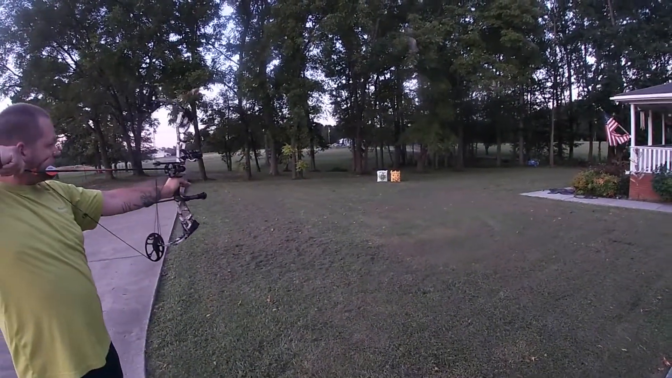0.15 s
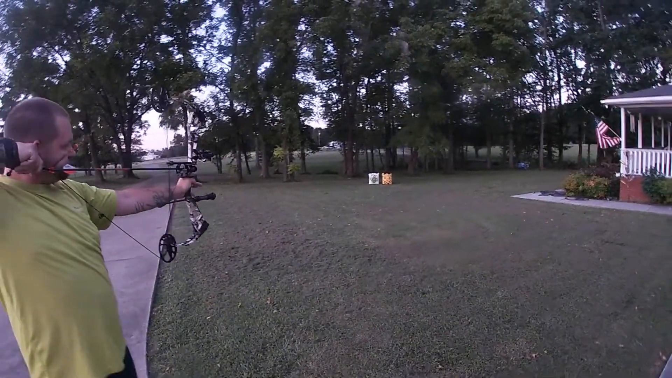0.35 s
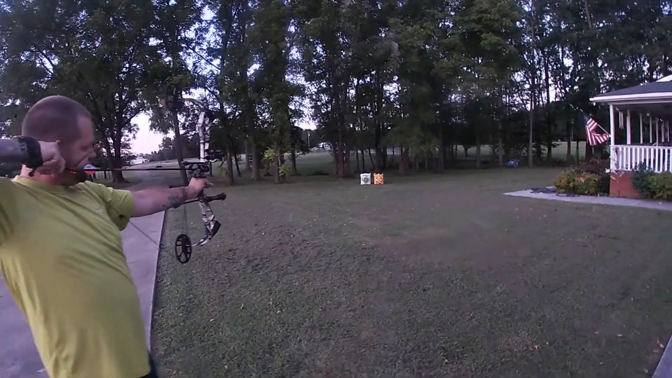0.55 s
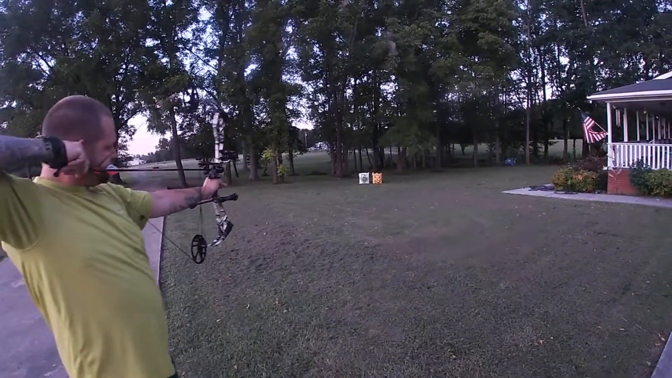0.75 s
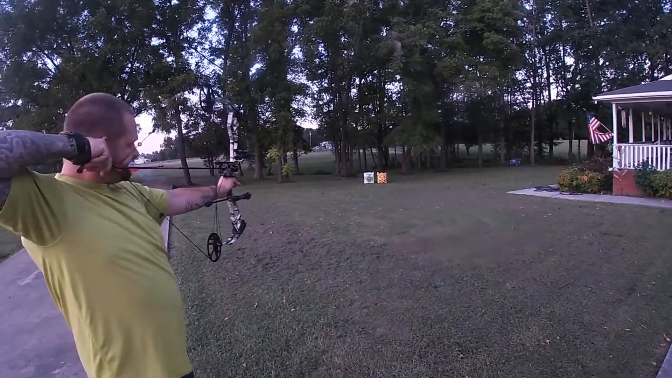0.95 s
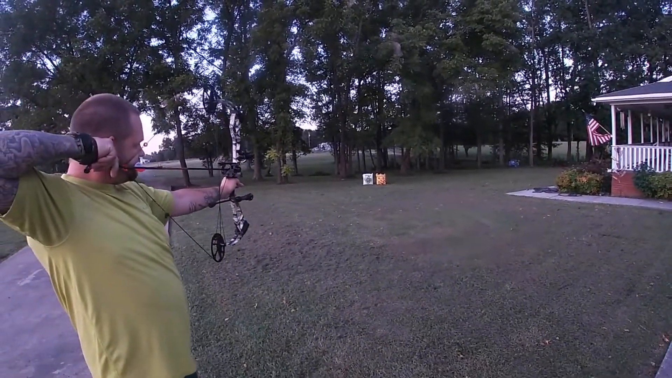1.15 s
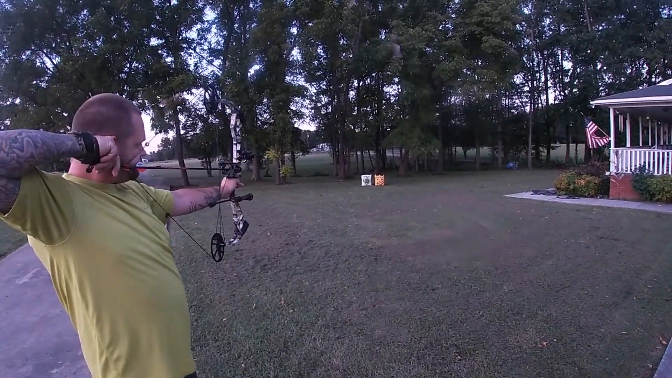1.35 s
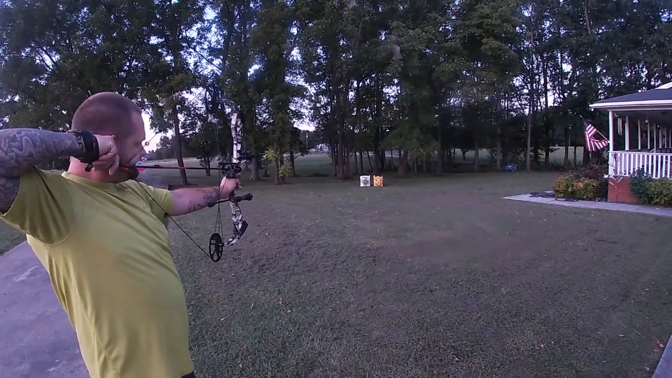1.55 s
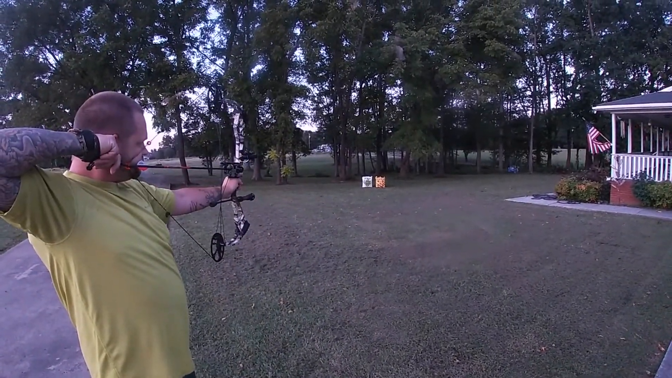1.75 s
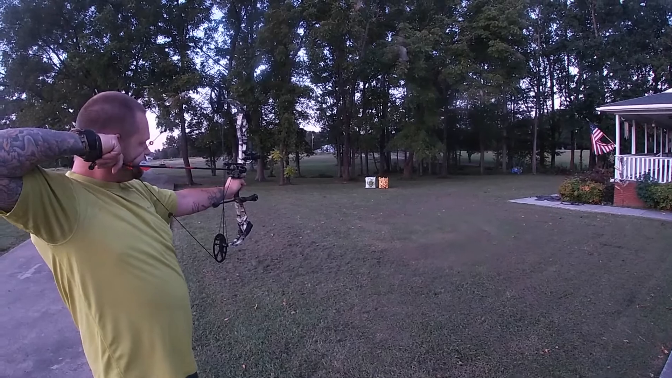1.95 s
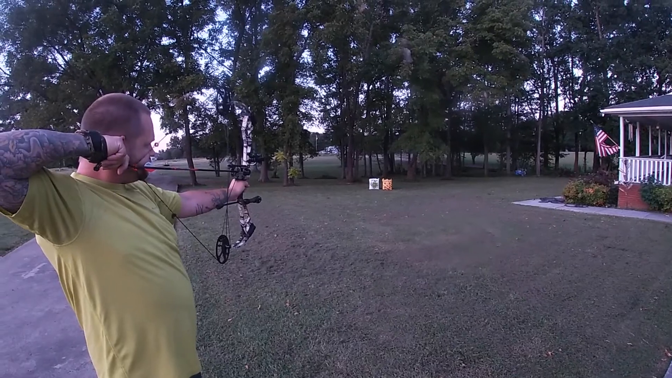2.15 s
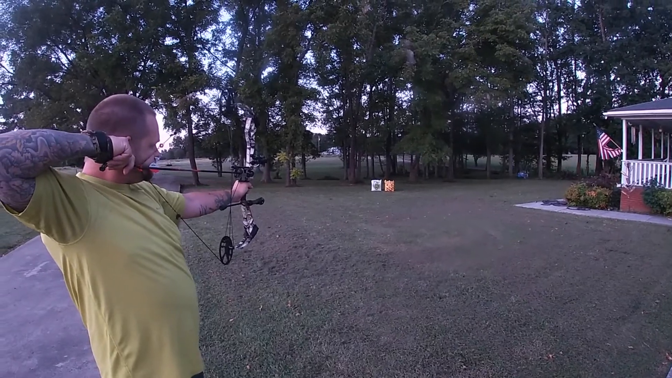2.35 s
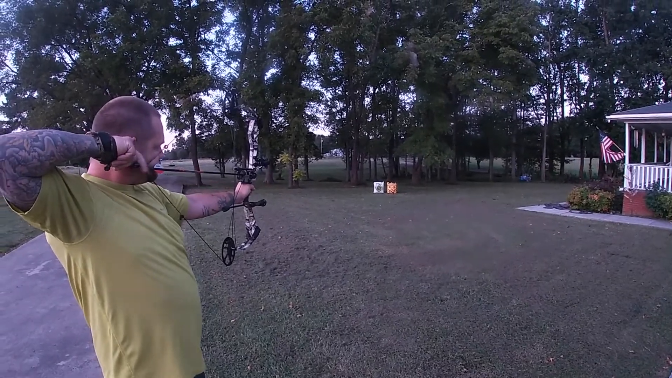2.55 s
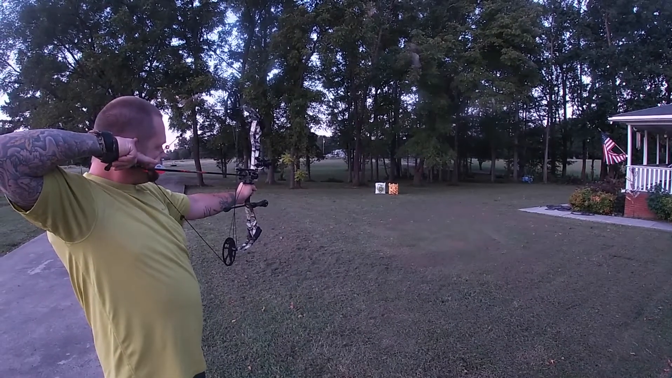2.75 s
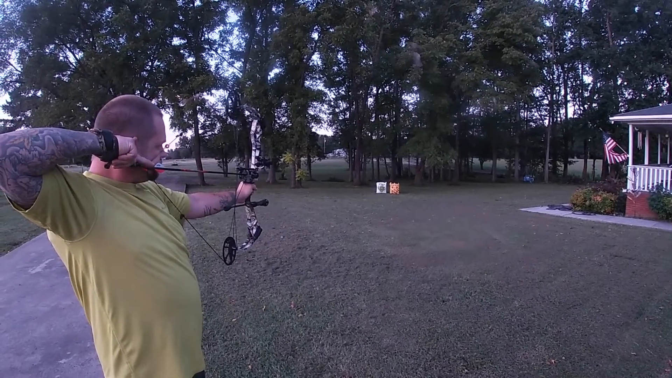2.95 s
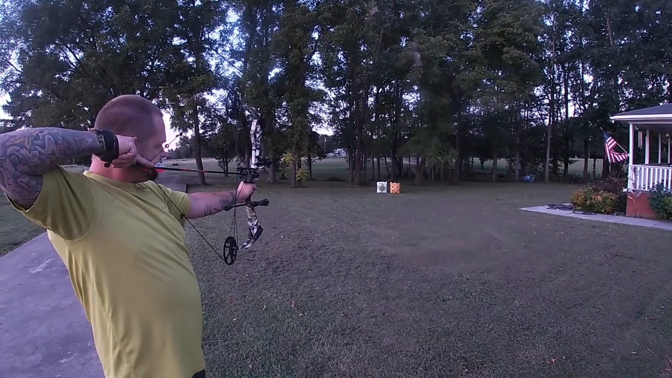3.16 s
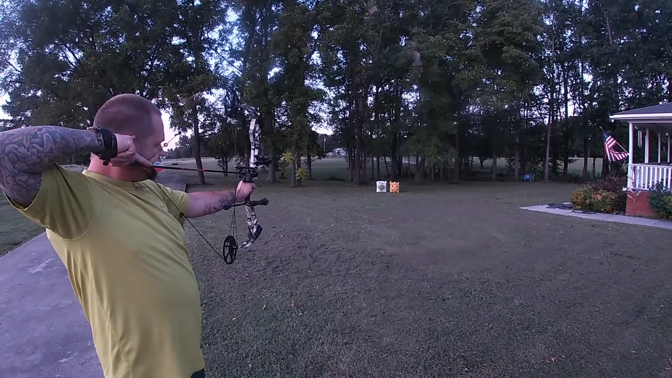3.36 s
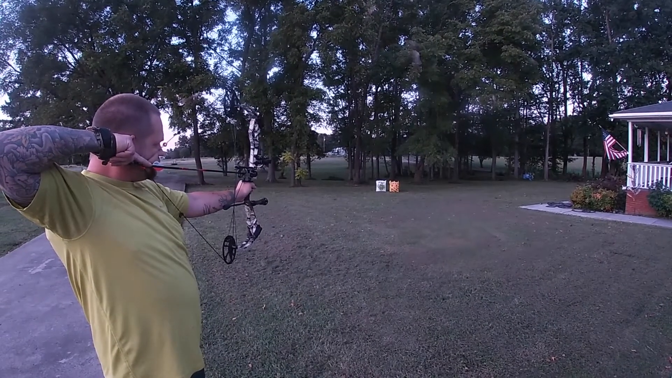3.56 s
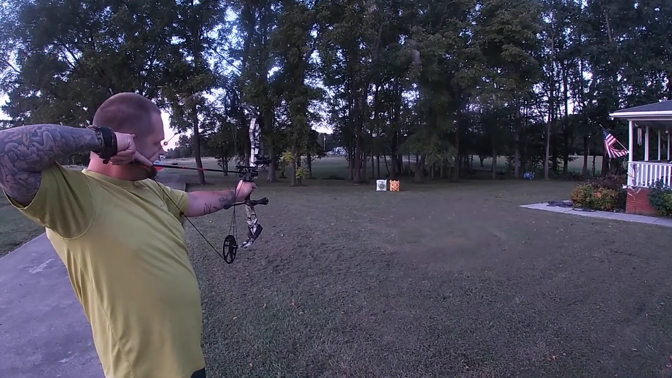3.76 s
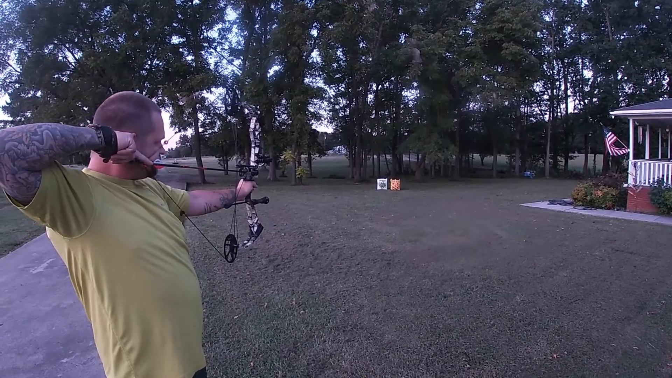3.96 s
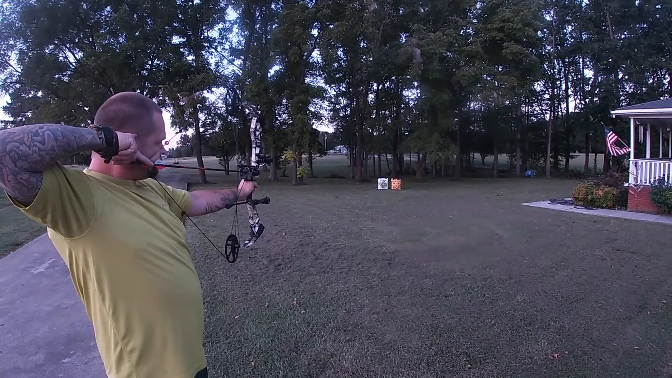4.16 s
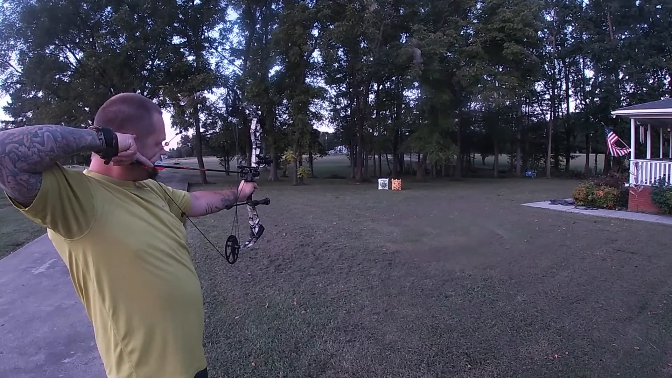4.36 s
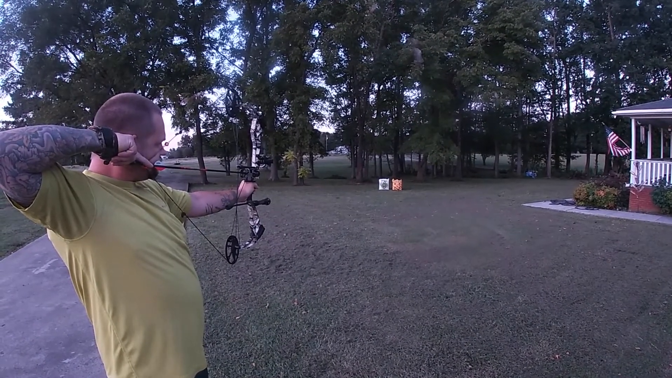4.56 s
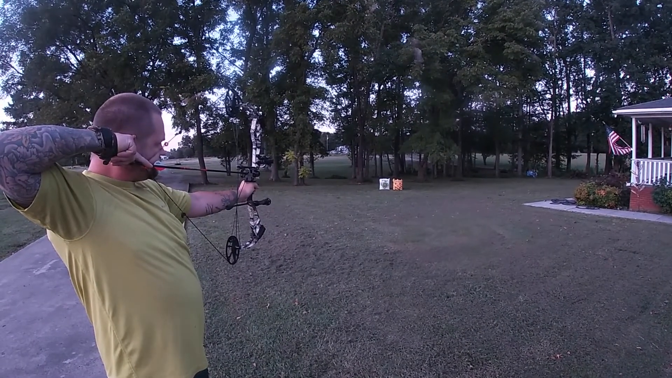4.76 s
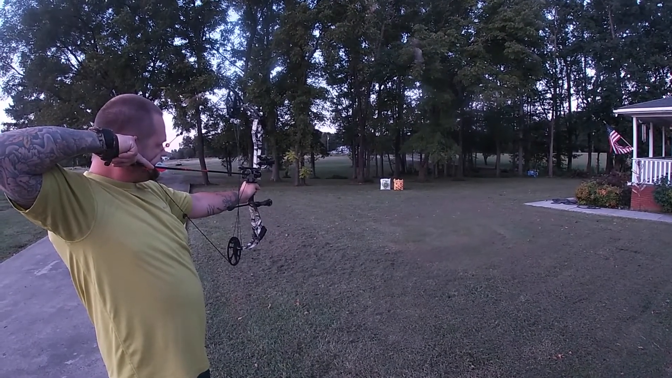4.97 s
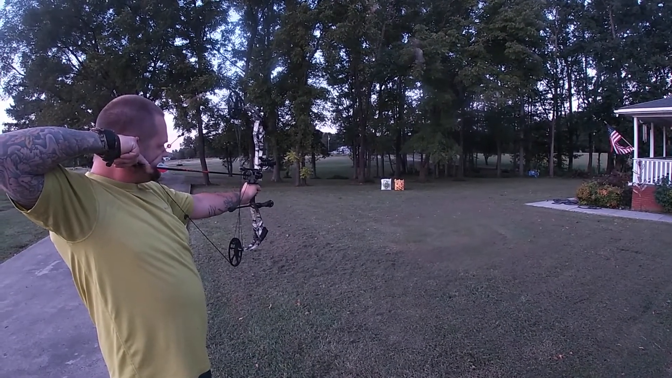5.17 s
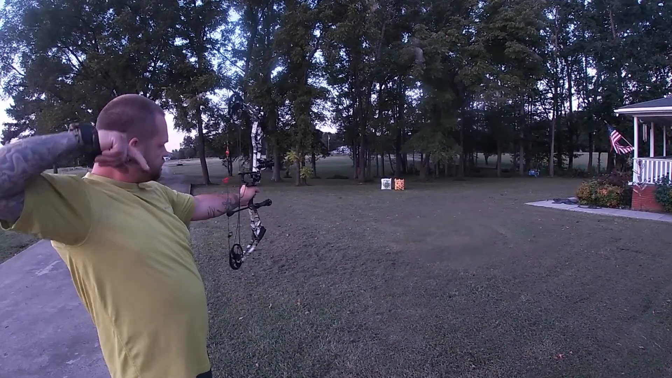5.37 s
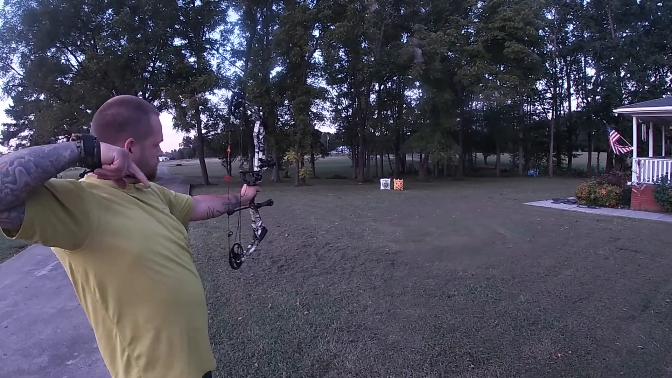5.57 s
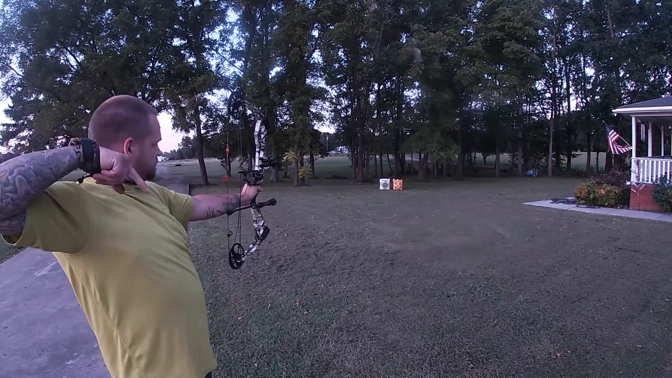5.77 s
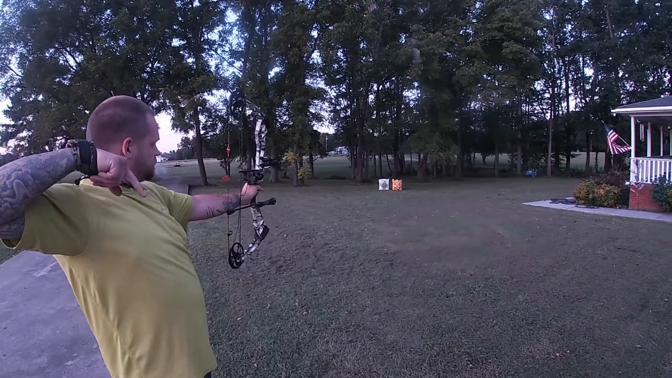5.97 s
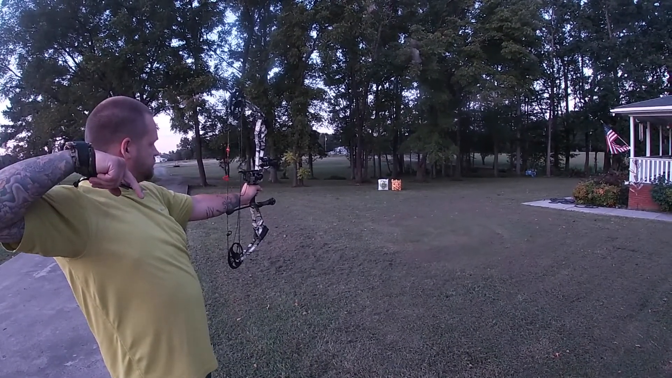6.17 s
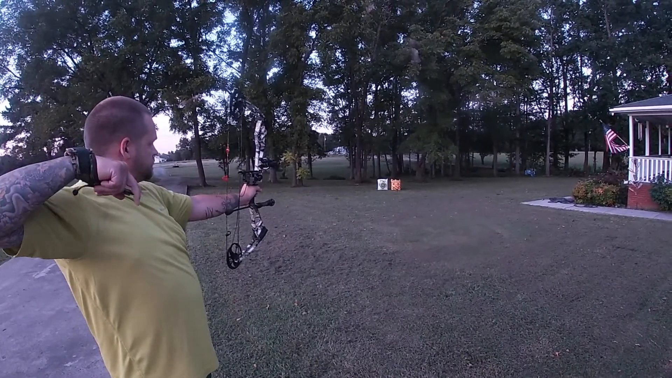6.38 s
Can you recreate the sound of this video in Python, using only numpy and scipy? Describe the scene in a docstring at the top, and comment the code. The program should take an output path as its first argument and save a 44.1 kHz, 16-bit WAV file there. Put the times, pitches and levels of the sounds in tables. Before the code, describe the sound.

A quiet outdoor background runs throughout: faint, high cricket trills and chirps, a distant rush of traffic, a barely audible machine hum and a light wind rumble on the microphone. A few soft gear knocks come in the first second, with one more tick at 4.1 seconds. A bird gives a thin, high note at 2.3 seconds, and a low puff of wind bumps the microphone around 2.5. From 3.5 to 5 seconds a far bird faintly repeats a short song four times. At 5.3 seconds a compound bow fires close by: a loud, sharp snap with a very brief rattle of string, cables and ringing limbs. At about 5.6 seconds the arrow hits a distant target with a sharp crack and a small, low thud. Both echo off a house and trees for about half a second, and the crickets carry on until 6.4 seconds.

```python
"""On a lawn at dusk, an archer close by shoots a compound bow: its parts strike in turn and its limbs
(the bending arms) ring. The arrow cracks into a far target. A house front and a row of trees throw
the sharp sounds back. Crickets rub their wings, birds whistle and gear knocks softly. Far away, traffic
and a machine hum, while a light breeze puffs on the microphone."""
import sys
import numpy as np
from scipy import signal
from scipy.io import wavfile
from scipy.ndimage import uniform_filter1d

SR = 44100
rng = np.random.default_rng(int(sys.argv[2]) if len(sys.argv) > 2 else 0)


def bounce(signal):
    """Save signal as a 16-bit WAV file at the path given by the first command-line argument."""
    frames = np.transpose(np.atleast_2d(signal))
    limited = np.clip(frames, -1, 1)
    pcm = np.round(limited * 32767).astype(np.int16)
    wavfile.write(sys.argv[1], SR, pcm)


N = 283122

# Bow parts strike in turn (release jaw, string on its stop, limbs, cables). A fade is a fall of 60 dB.
# start_s, peak_db, bright_hz, fade_s, limb_db
BOW_BLOWS = [(5.3120, -17, 6200, .007, -19), (5.3140, -1, 5700, .009, -27), (5.319, -21, 5200, .09, -33),
             (5.333, -16, 3300, .04, -20), (5.3372, -5, 4200, .009, -11), (5.3395, -3, 6500, .018, -13),
             (5.349, -4, 5900, .018, -12), (5.371, -6, 3500, .022, -24)]
# The tones a limb rings with: pitch_hz, level_db, fade_s
LIMB_TONES = [(178, -9.5, .045), (225, -13, .03), (345, -12, .05), (450, -5, .03), (610, -4, .022),
              (800, -2.5, .016), (1080, -4.1, .022), (1400, -3.5, .016), (1750, -5, .014), (2240, -4, .03),
              (2900, -8.6, .014)]
# The broad snap in each blow: frequency_hz, level_db
SNAP_SPECTRUM = [(60, -40), (200, -16), (700, -5), (2000, -3), (3500, -2), (6000, -3), (8000, -14),
                 (10500, -28), (14000, -42), (16000, -60)]
# A low push of air as the limbs fly forward: time_s, peak_db, pitch_hz
AIR_PUSH = (5.349, -27.5, 70)
# The arrow's crack: frequency_hz, level_db
CRACK_SPECTRUM = [(120, -42), (200, -12), (480, -6), (900, -11), (1910, -11), (2700, -8), (3690, 0),
                  (4120, 0), (5840, -4), (6280, -7), (7140, -22), (7800, -15), (9930, -20), (13800, -27),
                  (16000, -32)]
# The crack and the low boom after it: start_s, crack_db, boom_db, boom_hz, fullest_after_s, half_length_s
CRACK_AND_BOOM = (5.6406, 1, -21, 182, .011, .010)
# Echoes off the house, for bow and target: delay_s, level_db, smear_s
BOW_ECHOES = [(.004, -19, .01), (.070, -21, .0012), (.080, -20, .0015)]
TARGET_ECHOES = [(.0008, -12, .0015), (.005, -18, .012), (.024, -15, .006), (.030, -14, .01)]
# How long the trees echo: frequency_hz, fade_s
TREE_FADES = [(200, .3), (700, .45), (2000, .7), (4000, .7), (6000, .58), (9000, .38), (14000, .22)]
# The tone of their echo: frequency_hz, level_db
TREE_SPECTRUM = [(200, 8), (1000, 8), (2500, 2), (5000, 0), (8000, 0), (11000, -5), (13000, -14),
                 (15000, -28)]
# Tree cricket trills: start_s, end_s, pitch_hz, level_db
CRICKET_TRILLS = [(0, .18, 4100, -67), (.37, .97, 4000, -57.3), (.58, .92, 3810, -57.5),
                  (.65, 1.06, 4150, -58), (1.17, 1.63, 4170, -61.8), (1.06, 1.55, 3950, -67),
                  (1.63, 2.05, 3820, -61), (1.98, 2.52, 4080, -61.3), (2.5, 2.95, 3990, -56.8),
                  (2.7, 3.0, 3800, -64.8), (2.7, 2.9, 3500, -70), (2.93, 3.25, 4000, -65),
                  (3.12, 3.88, 4080, -61.8), (3.28, 3.75, 3850, -61), (3.85, 4.45, 4090, -59.8),
                  (3.87, 4.3, 3960, -59.8), (4.73, 5.3, 4030, -57.8), (4.78, 5.3, 3860, -63.8),
                  (4.72, 4.95, 3550, -68), (5.48, 5.92, 4460, -56.8), (5.9, 6.12, 4180, -61.8),
                  (6.13, 6.45, 3830, -58.3), (6.2, 6.45, 4100, -64.8)]
# Field cricket chirps: first_stroke_middle_s, stroke_count, level_db
CRICKET_CHIRPS = [(.358, 2, -65.5), (.948, 6, -62.5), (1.598, 6, -64.5), (2.271, 6, -62.5),
                  (3.058, 6, -63.5), (3.729, 6, -64.5), (4.432, 5, -62.5), (5.084, 5, -64.5),
                  (5.923, 2, -63.5)]
# The shape of a near bird's note: after_s, pitch_hz, level_db
NEAR_NOTE = [(0, 9500, -30), (.003, 8200, -14), (.007, 7200, -4), (.016, 6850, 0), (.028, 6900, 2),
             (.038, 7200, -4), (.05, 7800, -16), (.065, 8800, -26)]
# When it calls: start_s, level_db
NEAR_CALLS = [(2.318, -49), (5.285, -58)]
# The notes of a far bird's song: after_s, length_s, from_hz, to_hz, level_db
FAR_NOTES = [(0, .012, 3700, 4900, -54), (.065, .02, 2650, 2750, -66), (.078, .03, 2900, 3050, -62),
             (.12, .02, 3000, 2950, -66), (.17, .03, 3250, 3250, -61), (.195, .035, 3200, 2650, -62),
             (.25, .04, 3150, 3250, -69), (.31, .045, 2120, 2420, -58.5)]
# When it sings: start_s, level_db
FAR_CALLS = [(3.475, -1.5), (3.918, -1.5), (4.367, -3), (4.83, -6)]
# Small knocks on gear and a handheld camera: start_s, level_db, contact_hz, spread_octaves
GEAR_KNOCKS = [(.254, -27, 470, .3), (.468, -32, 2950, .3), (.7378, -24, 800, 2.2), (1.012, -31, 1800, .8),
               (4.1074, -28, 6000, .3)]
# The tones they ring with: pitch_hz, level_db, fade_s
GEAR_TONES = [(185, -3, .06), (470, -6, .035), (1100, -2, .011), (2950, -6, .005), (6000, -12, .004)]
# Wind rumble on the microphone: time_s, level_db, centre_hz
BREEZE_CURVE = [(0, -55, 45), (.3, -53, 60), (.7, -54, 52), (.77, -43, 30), (.96, -49, 36), (1.15, -47, 38),
                (1.6, -53, 52), (1.7, -59, 70), (1.92, -47, 50), (2.03, -56, 48), (2.3, -58, 55),
                (2.42, -46, 46), (2.6, -52, 57), (3.05, -59, 65), (3.25, -53, 42), (3.66, -47, 62),
                (3.74, -57, 48), (3.97, -49, 58), (4.5, -57, 70), (4.85, -50, 55), (5.3, -55, 70),
                (5.7, -54, 70), (5.93, -64, 75), (6.03, -42, 60), (6.17, -47, 84), (6.29, -60, 60),
                (6.42, -51, 75)]
# Single gusts on it: time_s, peak_db, pitch_hz
WIND_PUFFS = [(2.366, -32, 90), (2.4845, -18, 100)]
# Far road noise: frequency_hz, level_db
ROAD_SPECTRUM = [(60, -10), (120, -3), (170, 3), (220, -3), (320, -8.5), (620, -3), (1500, -5),
                 (2200, -15.5), (3000, -22.5), (5000, -23.3), (7000, -27.3), (8500, -38), (11000, -48),
                 (13000, -58), (14500, -82)]
# How it drifts: time_s, level_db, treble_lift_db, low_lift_db
ROAD_DRIFT = [(0, -47, 2, 4), (1.0, -46.5, 1, 2.5), (1.47, -46, -2, -2), (2.23, -49.5, 0, 0),
              (2.75, -50, 1, -1), (3.6, -48.5, 0, 0), (4.35, -48.5, 1, -1), (4.62, -45.5, 0, -2),
              (5.0, -48, 0, 0), (5.6, -48, 0, 0), (6.01, -50.5, 0, 2), (6.42, -49, -1, 0)]


def bow(rise_s=.0004, broad_db=-.4, band_ratio=1.19):
    """Each blow is a dying rattle with a bright centre, and it sets the limbs ringing."""
    blows, kicks, limbs = np.zeros(N), np.zeros(N), np.zeros(SR)
    snap = click(SNAP_SPECTRUM)
    t = np.arange(0, .07, 1 / SR)
    for start_s, peak_db, hz, fade_s, limb_db in BOW_BLOWS + cable_clatter():
        grit = rng.standard_normal(len(t)) * amp(-60 * t / fade_s) * (1 - np.exp(-t / rise_s))
        broad = signal.fftconvolve(grit, snap)[:len(t)]
        bright = bandpass(grit, hz / band_ratio, hz * band_ratio)
        blow = unit(bright) + amp(broad_db) * unit(broad)
        add(blows, start_s, amp(peak_db) * blow / abs(blow).max())
        add(kicks, start_s, amp(limb_db) * grit / np.linalg.norm(grit))
    for hz, db, fade_s in LIMB_TONES:
        add(limbs, 0, amp(db) * ring(hz, fade_s))
    bass_cut = signal.butter(5, 135, "highpass", fs=SR, output="sos")  # slim limbs give no deep bass
    return signal.sosfilt(bass_cut, blows + signal.fftconvolve(kicks, limbs)[:N])


def cable_clatter(count=13, start_s=5.341, gap_s=.0035, fade_s=.032, low_hz=1900, high_hz=5000):
    """Cables and their wheels rattle on after the string lands: extra, fading rows for BOW_BLOWS."""
    jitter, brightness, strength = rng.random((count, 3)).T
    after_s = (np.arange(count) + jitter) * gap_s
    hz = low_hz * (high_hz / low_hz) ** brightness
    peak_db = -10.5 - 5500 * after_s ** 2 + 4 * (strength - .5)
    limb_db = -14 - 500 * after_s
    return list(zip(start_s + after_s, peak_db, hz, np.full(count, fade_s), limb_db))


def crack_and_thud(sag=.1, rustle_db=-34, rustle_fade_s=.15):
    """The arrow cracks into the target. A dull rustle and a short, low boom follow the crack."""
    start_s, crack_db, boom_db, boom_hz, fullest_s, half_s = CRACK_AND_BOOM
    crack, thud = np.zeros((2, N))
    t = np.arange(0, .06, 1 / SR)
    add(crack, start_s, -amp(crack_db) * click(CRACK_SPECTRUM))
    rustle = unit(bandpass(rng.standard_normal(len(t)), 130, 700, order=2))
    add(thud, start_s, amp(rustle_db) * rustle * amp(-60 * t / rustle_fade_s))
    cycles = boom_hz * t * (1 + sag * (1 - t / (2 * fullest_s)))  # the pitch sinks
    boom = np.sin(2 * np.pi * cycles) + .15 * np.sin(2 * np.pi * 2.4 * cycles)
    swell = np.exp(-abs((t - fullest_s) / half_s) ** 3)
    add(thud, start_s, -amp(boom_db) * boom * swell)
    return crack, thud


def house_echo(sound, echoes):
    """Each echo is a short burst of bounces off rails, posts and wall."""
    bounces, t = np.zeros(SR), np.arange(0, .05, 1 / SR)
    for delay_s, db, smear_s in echoes:
        burst = rng.standard_normal(len(t)) * np.exp(-t / smear_s)
        add(bounces, delay_s, amp(db) * burst / np.linalg.norm(burst))
    return signal.fftconvolve(sound, bandpass(bounces, 1200, 8500))[:N]


def tree_echo(sound, stretch, rise_s=.012):
    """Trunks and leaves return a wash of echoes, each band dying at its own speed."""
    hz, t, bands = signal.stft(rng.standard_normal(SR), SR, nperseg=256)
    fade_s = stretch * look_up(TREE_FADES, hz)[:, None]
    bands = bands * amp(look_up(TREE_SPECTRUM, hz)[:, None] - 60 * t / fade_s)
    tail = signal.istft(bands, SR, nperseg=256)[1]
    tail *= 1 - np.exp(-(np.arange(len(tail)) / SR / rise_s) ** 2)
    return signal.fftconvolve(sound, tail / np.linalg.norm(tail))[:N]


def tree_crickets(strokes_per_s=37.5, sounding_share=.66, sag=.045, rough=.55, wander=.004, uneven=.04):
    """Fast wing strokes make a swelling trill; each is a rough tone that sinks in pitch."""
    out = np.zeros(N)
    for start_s, end_s, hz, db in CRICKET_TRILLS:
        t = np.arange(0, end_s - start_s, 1 / SR)
        haste, wobble_speed, offset = rng.random(3)
        flutter, drift, pace = (smooth_noise(SR, width)[:len(t)] for width in (90, 2500, 2500))
        rate = strokes_per_s * (.98 + .04 * haste + uneven * pace)
        stroke = np.minimum(np.cumsum(rate) / SR % 1 / sounding_share, 1)  # runs 0 to 1, then rests
        wobble = 1 + .3 * np.sin(2 * np.pi * ((5 + 9 * wobble_speed) * t + offset)) + rough * flutter
        swell = np.minimum(1, .7 + t / .6) * np.minimum(1, (t[-1] - t) / .03)
        tone = note(hz * (1 + sag * (.5 - stroke) + wander * drift))
        add(out, start_s, amp(db) * swell * wobble * np.sin(np.pi * stroke) * tone)
    return out


def field_cricket(pitch_hz=5380, gap_s=.0476, stroke_s=.021):
    """A few clean wing strokes in a row make each chirp."""
    out = np.zeros(N)
    stroke = np.linspace(0, 1, int(stroke_s * SR))
    for middle_s, count, db in CRICKET_CHIRPS:
        for k in range(round(count)):
            tone = note(pitch_hz * (1 + .006 * (.5 - stroke)))
            add(out, middle_s + k * gap_s - stroke_s / 2, amp(db) * np.sin(np.pi * stroke) * tone)
    return out


def birds(waver_hz=70):
    """Gliding whistles: a near bird gives single notes and a far one repeats a short song."""
    near, far = np.zeros((2, N))
    times, hz, db = np.transpose(NEAR_NOTE)
    t = np.arange(0, times[-1], 1 / SR)
    for start_s, call_db in NEAR_CALLS:
        add(near, start_s, amp(call_db + np.interp(t, times, db)) * note(np.interp(t, times, hz)))
    for start_s, call_db in FAR_CALLS:
        for after_s, length_s, from_hz, to_hz, note_db in FAR_NOTES:
            progress = np.linspace(0, 1, int(length_s * SR))
            waver = waver_hz * np.sin(2 * np.pi * (1.5 * progress + rng.random()))
            whistle = note(from_hz + (to_hz - from_hz) * progress + waver)
            add(far, start_s + after_s, amp(call_db + note_db) * np.sin(np.pi * progress) * whistle)
    return near, far


def gear_knocks(tick_db=-6):
    """A knock rings the tones near its contact pitch, each with a dry tick of noise."""
    out = np.zeros(N)
    for start_s, db, contact_hz, octaves in GEAR_KNOCKS:
        for hz, tone_db, fade_s in GEAR_TONES:
            gain = amp(db + tone_db) * np.exp(-.5 * (np.log2(hz / contact_hz) / octaves) ** 2)
            tick = rng.standard_normal(400) * np.exp(-np.arange(400) / 30)
            add(out, start_s, gain * ring(hz, fade_s, rise_s=.0004))
            add(out, start_s, gain * amp(tick_db) * bandpass(tick, hz / 2, hz * 1.7))
    return out


def breeze(width=.62, lumpy_db=2.5, gusty_db=1.5):
    """Wind on the microphone makes a lumpy, wandering rumble and single puffs."""
    times, db, centre_hz = np.transpose(BREEZE_CURVE)
    hz, t, bands = signal.stft(rng.standard_normal(N), SR, nperseg=2048, noverlap=1792)
    off_centre = np.log((hz[:, None] + 4) / np.interp(t, times, centre_hz))
    shape = np.exp(-.5 * (off_centre / width) ** 2) / (1 + (hz[:, None] / 150) ** 4)
    shape /= np.sqrt((shape ** 2).mean(0))
    rumble = signal.istft(bands * shape, SR, nperseg=2048, noverlap=1792)[1][:N]
    level_db = np.interp(np.arange(N) / SR, times, db)
    level_db += lumpy_db * smooth_noise(N, 900) + gusty_db * smooth_noise(N, 3000)
    return unit(rumble) * amp(level_db) + sum(air_puff(*row) for row in WIND_PUFFS)


def air_puff(time_s, peak_db, hz):
    """One pulse of air: a push, a pull and a slowing rebound."""
    out, t = np.zeros(N), np.arange(-.02, .12, 1 / SR)
    cycles = t * hz
    swell = np.exp(-np.where(cycles < 0, (cycles / .27) ** 2, (cycles / 1.1) ** 3))
    wave = np.cos(2 * np.pi * cycles / (1 + .3 * abs(cycles)))
    add(out, time_s + t[0], amp(peak_db) * wave * swell)
    return out


def traffic(patchy_db=1.0):
    """A far road gives a steady rush whose loudness and tone drift."""
    frames, hz = N // 256 + 5, np.fft.rfftfreq(1024, 1 / SR)
    real, imag, patches = rng.standard_normal((frames, 513, 3)).T
    patches = unit(uniform_filter1d(uniform_filter1d(patches, 10, axis=0), 20, axis=1))
    times, *columns = np.transpose(ROAD_DRIFT)
    db, treble_db, low_db = (np.interp(np.arange(frames) * 256 / SR, times, c) for c in columns)
    treble = np.clip((hz - 1800) / 1500, 0, 1)[:, None]
    low = np.clip((600 - hz) / 200, 0, 1)[:, None]
    drift_db = patchy_db * patches + db + treble * treble_db + low * low_db
    bands = (real + 1j * imag) * amp(look_up(ROAD_SPECTRUM, hz)[:, None] + drift_db)
    rush = signal.istft(bands, nperseg=1024, noverlap=768)[1][:N]
    return unit(rush) * np.sqrt(np.mean(amp(db) ** 2))


def machine_hum(pitch_hz=201, width_hz=14, level_db=-61):
    """A far machine holds one low, fuzzy tone."""
    edges_hz = [pitch_hz - width_hz / 2, pitch_hz + width_hz / 2]
    band = signal.butter(2, edges_hz, "bandpass", fs=SR, output="sos")
    return amp(level_db) * unit(signal.sosfilt(band, rng.standard_normal(N)))


def amp(db):
    """Turns decibels into a multiplier."""
    return 10 ** (np.asarray(db) / 20)


def unit(x):
    """Scales to an average (rms) level of 1."""
    return x / np.sqrt(np.mean(x ** 2) + 1e-20)


def look_up(table, hz):
    """Reads between a table's rows on a log-frequency scale."""
    row_hz, values = np.transpose(table)
    return np.interp(np.log(hz + 1), np.log(row_hz + 1), values)


def add(mix, start_s, sound):
    """Mixes a sound in at start_s."""
    part = mix[max(round(start_s * SR), 0):][:len(sound)]
    part += sound[:len(part)]


def bandpass(x, low_hz, high_hz, order=3):
    """Keeps what lies between two frequencies."""
    return signal.lfilter(*signal.butter(order, [low_hz, high_hz], "bandpass", fs=SR), x)


def highpass(x, hz, order):
    """Keeps what lies above hz."""
    return signal.lfilter(*signal.butter(order, hz, "highpass", fs=SR), x)


def smooth_noise(length, width):
    """A random wiggle, smoothed over width samples."""
    return unit(uniform_filter1d(uniform_filter1d(rng.standard_normal(length), width), width))


def click(spectrum, size=2048):
    """The most sudden (minimum-phase) click with this spectrum, peak 1."""
    db = look_up(spectrum, abs(np.fft.fftfreq(size, 1 / SR)))
    log_gain = np.log(amp(np.maximum(db, -100)))
    pulse = np.fft.ifft(np.exp(np.conj(signal.hilbert(log_gain)))).real[:size // 2]
    return pulse / abs(pulse).max()


def ring(hz, fade_s, rise_s=0.):
    """A dying tone with an optional soft start."""
    t = np.arange(int(fade_s * SR) + 8) / SR
    return amp(-60 * t / fade_s) * np.sin(2 * np.pi * hz * t) * (1 - np.exp(-t / (rise_s + 1e-5)))


def note(hz):
    """A pure tone that follows a pitch curve."""
    return np.sqrt(2) * np.sin(2 * np.pi * (np.cumsum(hz) / SR + rng.random()))


def scene():
    """Mixes the sources, with their echoes, into left and right."""
    shot, (crack, thud) = bow(), crack_and_thud()
    trills, chirps, (near_bird, far_bird) = tree_crickets(), field_cricket(), birds()
    mix = shot + air_puff(*AIR_PUSH) + house_echo(shot, BOW_ECHOES)
    mix += amp(-13.5) * tree_echo(highpass(shot, 7000, order=1), stretch=.85)
    mix += amp(-4) * tree_echo(highpass(shot, 12500, order=3), stretch=1.2)  # near leaves return the fizz
    mix += crack + thud + house_echo(crack, TARGET_ECHOES) + amp(-11) * tree_echo(crack, stretch=1.05)
    mix += trills + amp(.8) * tree_echo(trills, stretch=.35)
    mix += chirps + amp(-16) * tree_echo(chirps, stretch=.3)
    mix += near_bird + amp(-5) * tree_echo(near_bird, stretch=.7)
    mix += far_bird + amp(-5) * tree_echo(far_bird, stretch=.35)
    mix += traffic() + machine_hum() + breeze() + gear_knocks()
    side = amp(-22) * highpass(shot, 5000, order=2)  # a faint left-right difference in the shot's treble
    return np.array([mix + side, mix - side])


def record(dry, top_hz=16500):
    """Rounds off the loudest peaks, then cuts the highest treble."""
    rounded = np.sign(dry) * (.7 + .3 * np.tanh((abs(dry) - .7) / .3))
    soft = np.where(abs(dry) < .7, dry, rounded)
    treble_cut = signal.firwin(511, top_hz, window=("kaiser", 9), fs=SR)
    return signal.oaconvolve(soft, treble_cut[None], "same")


dry = scene()
out = record(dry)
bounce(out)
```